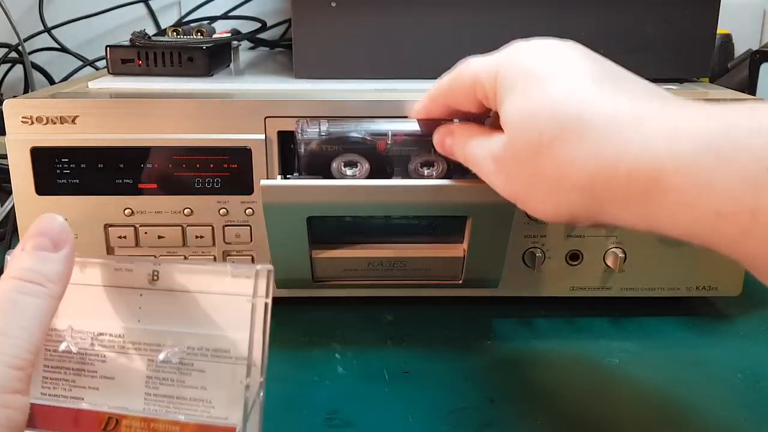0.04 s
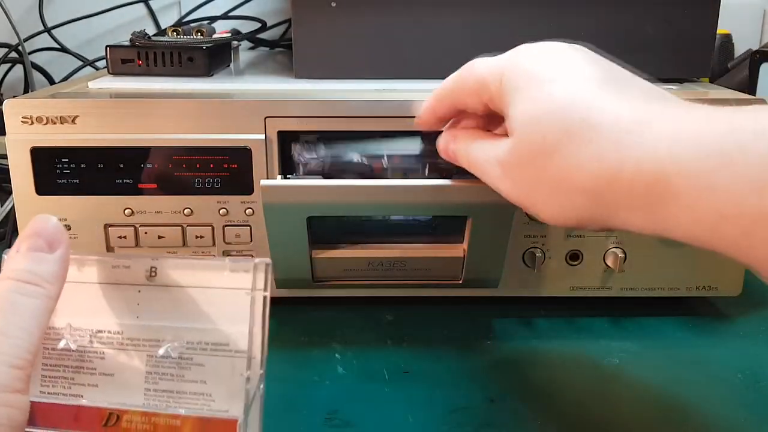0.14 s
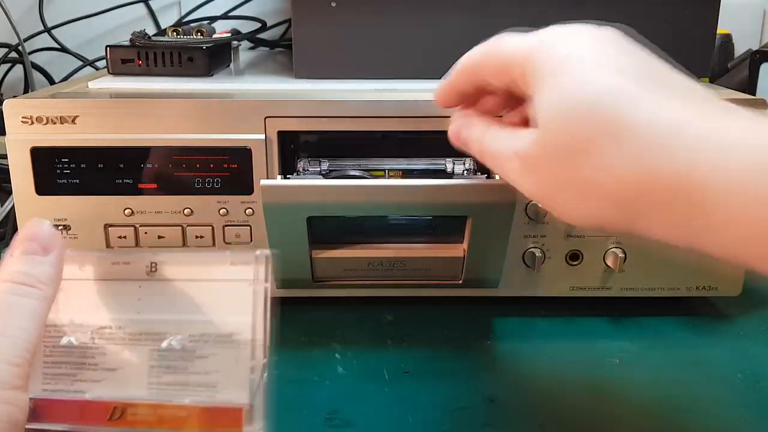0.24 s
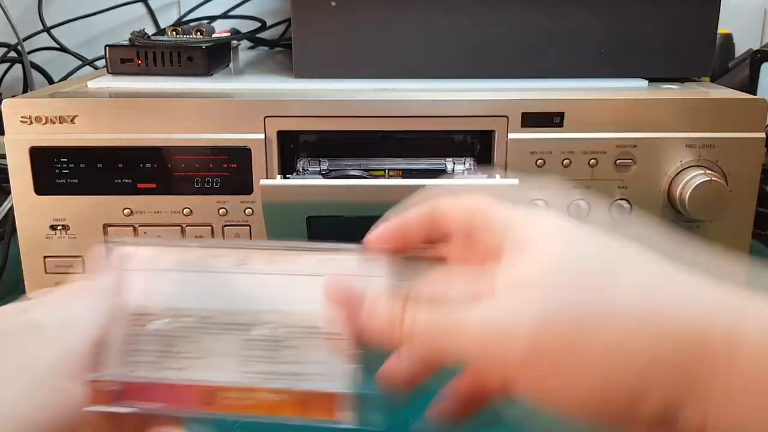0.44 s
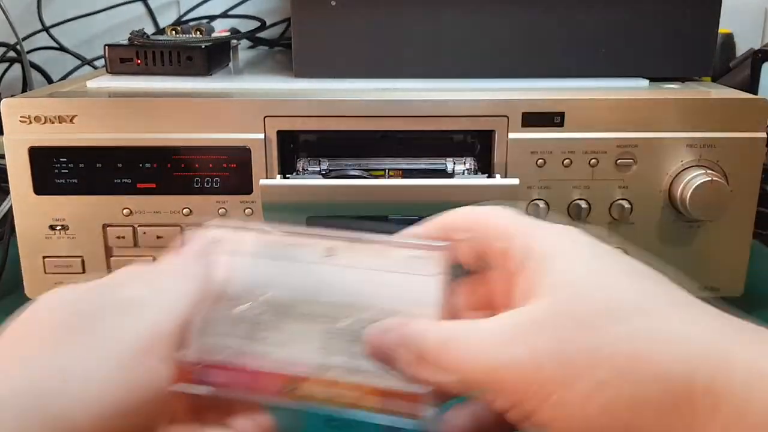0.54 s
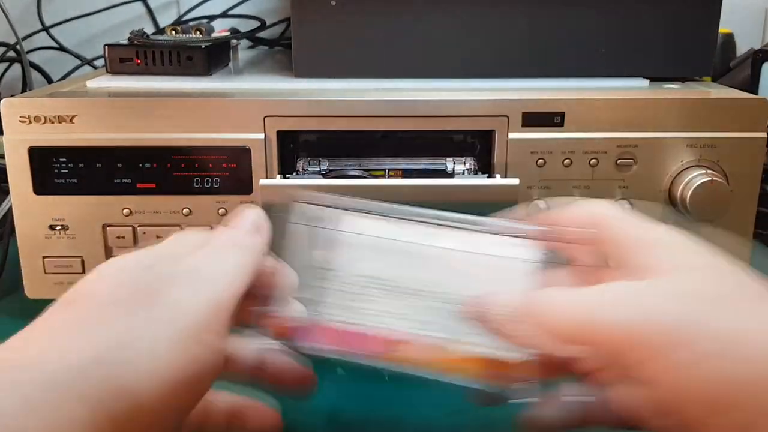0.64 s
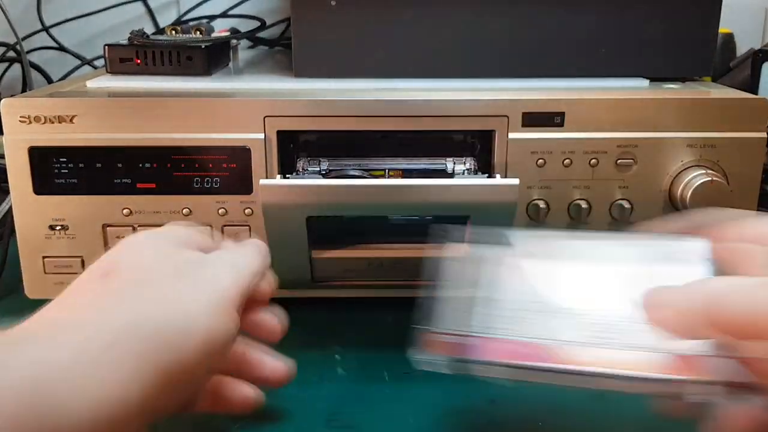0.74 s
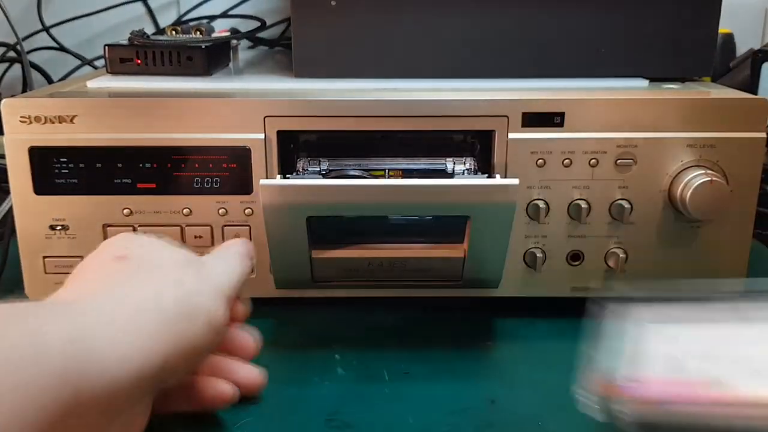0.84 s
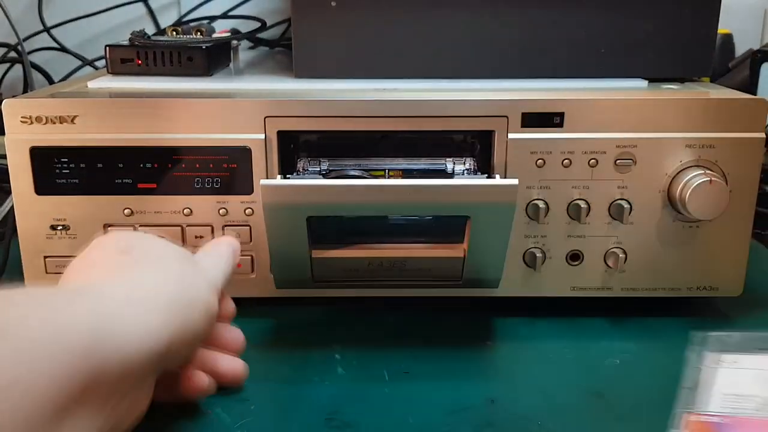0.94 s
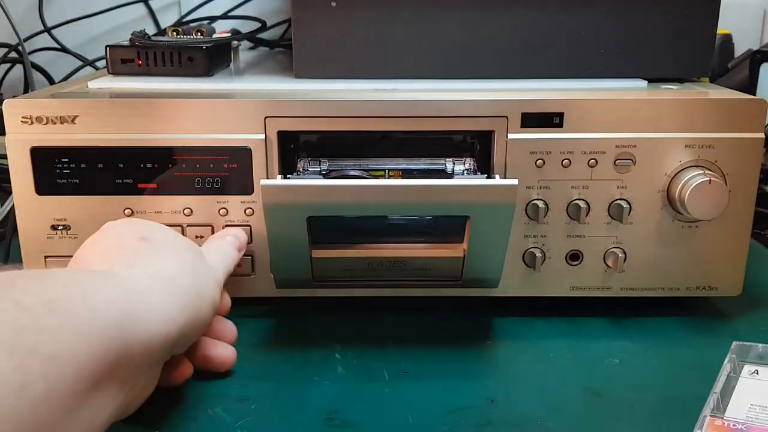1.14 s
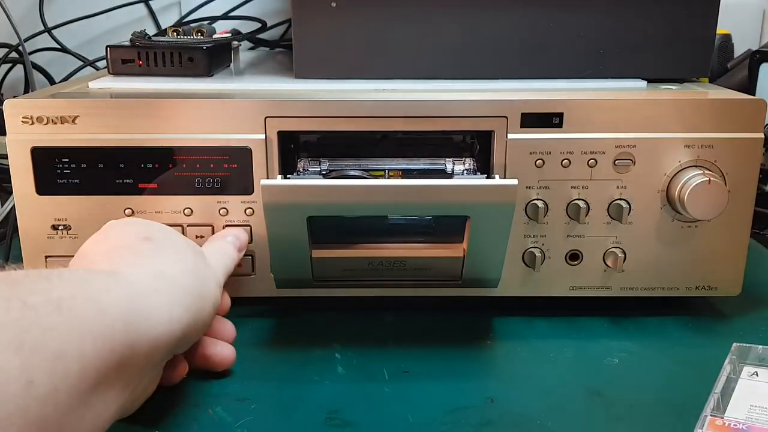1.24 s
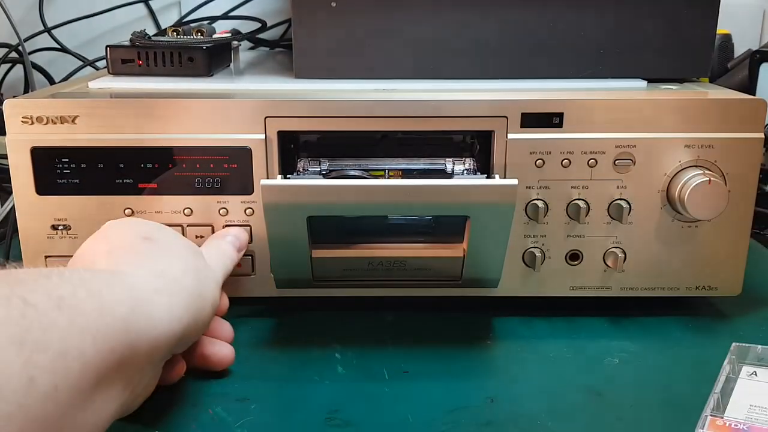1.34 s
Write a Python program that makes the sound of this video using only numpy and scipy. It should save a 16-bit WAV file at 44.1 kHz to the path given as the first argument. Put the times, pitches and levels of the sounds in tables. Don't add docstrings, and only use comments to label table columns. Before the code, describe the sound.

Close phone microphone in a small furnished room with low hum: a cassette clunks into a deck holder, the chassis rings softly, the holder ticks, a thin plastic case hits the desk, and a thumb taps a button.

```python
import sys
import numpy as np
from scipy import signal
from scipy.fft import rfft, irfft
from scipy.io import wavfile

SR = 44100
rng = np.random.default_rng(int(sys.argv[2]) if len(sys.argv) > 2 else 0)


def rack_gain(trim_db):
    fader = np.asarray(trim_db, float)
    return 10 ** (fader / 20)


def persist_wave(psi):
    counts = np.round(np.clip(psi, -1, 1) * 32767).astype(np.int16)
    wavfile.write(sys.argv[1], SR, np.atleast_2d(counts).T)


N = 61739
TIME_S = np.arange(N) / SR


def at_hz(points, hz, column=1):
    points = np.array(points)
    return np.interp(np.log(hz), np.log(points[:, 0]), points[:, column])


def rms_one(x):
    return x / np.sqrt(np.mean(x ** 2) + 1e-20)


def coloured(x, spectrum):
    hz = np.maximum(np.fft.rfftfreq(len(x), 1 / SR), 1)
    return irfft(rfft(x) * rack_gain(at_hz(spectrum, hz)), len(x))


def bandpass(x, low_hz, high_hz):
    return signal.sosfilt(signal.butter(2, [low_hz, high_hz], "band", fs=SR, output="sos"), x)


def ring(clicks, hz, t60_s):
    radius = rack_gain(-60 / (max(t60_s, 1e-3) * SR))
    w = 2 * np.pi * hz / SR
    return signal.lfilter([0, np.sin(w)], [1, -2 * radius * np.cos(w), radius ** 2], clicks + 1e-18)


def struck(hits, modes, crack_colour, rise_s):
    spread_db, crack_t60_s, crack_rise_s = 2.0, 0.027, 0.00013
    body, cracks = np.zeros((2, N))
    chance = rng.standard_normal((len(hits), len(modes)))
    noise = rms_one(coloured(rng.standard_normal(N), crack_colour))
    pushes = []
    for start_s, level_db, crack_db, soft_ms in hits:
        age = np.maximum(TIME_S - start_s, 0)
        push = age * np.exp(-age * 4000 / max(soft_ms, .02))
        pushes.append(rack_gain(level_db) * push / push.sum())
        cracks += rack_gain(crack_db - 60 * age / crack_t60_s) * np.minimum(age / crack_rise_s, 1) * noise
    for k, (hz, level_db, t60_s) in enumerate(modes):
        force = rack_gain(level_db + spread_db * chance[:, k]) @ np.array(pushes)
        rising_t60_s = 1 / (1 / t60_s + 1 / (np.log(1000) * rise_s))
        swell = ring(force, hz, t60_s) - ring(force, hz, rising_t60_s)
        body += (-1) ** k * swell
    return np.array([body, cracks])


# start_s, level_db, crack_db, soft_ms
HOLDER_HITS = [(0.0005, -49, -70.5, 0.6), (0.007, -52.5, -82.5, 0.56), (0.1905, -33, -53.5, 0.2),
               (0.194, -26.5, -64.5, 0.26), (0.205, -43, -67, 0.67), (0.2105, -28.5, -65.5, 0.11),
               (0.2155, -47, -64.5, 0.38), (0.221, -35.5, -56, .25), (0.2412, -10, -27, 0.1),
               (0.2439, -29, -27, 0.14), (0.2465, -17.5, -38.5, .15), (0.2483, -11, -31.5, 0.53),
               (0.2509, -14.5, -36.5, 0.35), (0.2575, -21, -36.5, 0.74), (0.278, -39.5, -46.5, 0.44),
               (0.287, -32.5, -51.5, 0.13)]
# pitch_hz, level_db, t60_s
HOLDER_MODES = [(566.6, -15.5, 0.083), (648.5, -17, 0.087), (780, -17, 0.071), (877, -38.5, 0.03),
                (1050, -13.5, 0.027), (1200, -31, 0.013), (1300, -10, 0.0592), (1531, -13.5, 0.038),
                (1850, -27, 0.21), (2416, -32, 0.15), (3372, -19.5, 0.039), (3780, -17.5, .04),
                (4420, -22, 0.0085), (6460, -31.5, .04)]
# freq_hz, level_db (per Hz)
HOLDER_CRACK = [(300, -3.5), (1100, 3.5), (2400, -7.5), (4000, -6), (6000, -9), (8000, -20.5),
                (11000, -20.5), (15500, -39.5)]


def holder_clunk():
    return struck(HOLDER_HITS, HOLDER_MODES, HOLDER_CRACK, rise_s=0.0015)


# start_s, pitch_hz, level_db, hold_s, swell_db
HOLLOWS = [
    (.2415, 1129, -16.5, .0118, 4.5),
    (1.0045, 1010, -28, .009, -5),
    (.1908, 1129, -38, .007, 6),
    (.219, 1110, -40, .007, 3),
]


def hollow():
    attack_s, release_t60_s = .0006, .014
    start_s, hz, level_db, hold_s, swell_db = np.transpose(HOLLOWS)[:, :, None]
    age = np.maximum(TIME_S - start_s, 0)
    swell = swell_db * np.minimum(age / hold_s, 1)
    release = 60 * np.maximum(age - hold_s, 0) / release_t60_s
    height = rack_gain(level_db + swell - release) * (1 - np.exp(-age / attack_s))
    return np.sum(height * np.sin(2 * np.pi * hz * age), axis=0)


# start_s, pitch_hz, level_db, t60_s
PINGS = [(-.004, 580.5, -46, 0.056), (-.003, 1130, -46.5, 0.04), (-.003, 2296, -69, 0.084),
         (-.003, 3960, -74, 0.06), (.006, 614, -44.5, 0.028), (.023, 4100, -75, 0.042),
         (.2035, 1200, -42.5, 0.041), (.2115, 1130, -37, 0.013), (.2565, 1125, -21, 0.027),
         (.192, 5900, -70, .08), (0.199, 4500, -46, 0.035), (0.209, 3140, -45, 0.015),
         (0.219, 4080, -52, .05), (0.226, 3020, -46, .02), (.2425, 4700, -21.5, 0.023),
         (.242, 3290, -26.5, .03), (.243, 5900, -36, .03), (0.2437, 5330, -47.5, .04),
         (.247, 3476, -26, 0.039), (.2475, 1850, -22, 0.027), (.249, 3870, -28, .035),
         (.250, 4460, -47, .03), (0.255, 7000, -44.5, .02), (.279, 1300, -26.5, 0.035),
         (1.001, 4700, -74, 0.018), (1.0039, 7000, -34.5, 0.017), (1.0045, 11020, -44.5, 0.017),
         (1.0055, 8850, -50, 0.023), (1.006, 2080, -34.5, 0.023), (1.012, 2750, -44.5, 0.052),
         (1.017, 3710, -43, 0.028), (1.02, 1319, -38.5, 0.064), (1.036, 1200, -55, 0.16),
         (1.025, 4400, -62.5, 0.11), (1.044, 2740, -53, 0.096), (1.3155, 3600, -74, 0.014),
         (1.326, 1200, -69, 0.15), (1.3655, 1910, -51, 0.047), (1.371, 830, -50, .02),
         (1.3725, 500, -60, 0.012), (1.39, 1710, -63, 0.047), (.6575, 1042, -64, 0.029),
         (1.005, 14200, -64, 0.013), (1.375, 3200, -66, 0.053)]


def pings():
    rise_s = .001
    start_s, hz, level_db, t60_s = np.transpose(PINGS)[:, :, None]
    age = np.maximum(TIME_S - start_s, 0)
    height = rack_gain(level_db - 60 * age / np.maximum(t60_s, .003)) * (1 - np.exp(-age / rise_s))
    return np.sum(height * np.sin(2 * np.pi * hz * age), axis=0)


# pitch_hz, level_db, t60_s
RINGS = [(543, -49.5, 0.94), (1130, -59, 0.81), (3380, -89, 0.42), (196.7, -20, 0.1), (250, -42.5, 0.77),
         (322.7, -34, 0.15), (480.2, -33, 0.058), (177.5, -48, 0.2), (212.5, -42, 0.14), (373, -50.5, 0.38)]
RING_STARTS = [0.25, 0.25, 0.65, 0.256, 0.262, 0.244, 0.246, 1.006, 0.2, 0.196]


def long_rings():
    rise_s, latch_s, latch_t60_s = 0.0068, .6, .08
    out = np.zeros(N)
    for start_s, (hz, level_db, t60_s) in zip(RING_STARTS, RINGS):
        age = np.maximum(TIME_S - start_s, 0)
        damped_s = np.maximum(TIME_S - latch_s, 0) * (start_s < latch_s)
        height = rack_gain(level_db - 60 * age / t60_s - 60 * damped_s / latch_t60_s)
        out += height * (1 - np.exp(-age / rise_s)) * np.sin(2 * np.pi * hz * age)
    return out


# time_s, level_db
SLIDE = [(0.13, -90.5), (0.147, -73.5), (0.16, -65.5), (0.189, -61), (0.198, -56), (0.215, -57),
         (0.231, -67.5), (0.238, -70.5)]
# time_s, level_db
CREEP = [(.625, -93), (.642, -84), (.66, -77), (0.689, -99)]
# pitch_hz, level_db, t60_s
GUIDES = [(1090, -2.5, 0.031), (2140, -6, 0.0065), (4560, 1, 0.0023), (5600, -2.5, .005),
          (6200, -12.5, 0.0037), (8450, -20.5, .004), (10300, -20, .005)]


def slide():
    slips_per_s = 8000
    slips = (rng.random(N) < slips_per_s / SR) * rack_gain(2.4 * rng.exponential(1, N))
    slips = slips * rng.choice([-1, 1], N)
    slips = signal.sosfilt(signal.butter(6, 12000, fs=SR, output="sos"), slips)
    rasp = np.zeros(N)
    for hz, level_db, t60_s in GUIDES:
        rasp += rack_gain(level_db) * rms_one(ring(slips, hz, t60_s))
    motion = np.zeros(N)
    for move in (SLIDE, CREEP):
        time_s, level_db = np.transpose(move)
        motion += rack_gain(np.interp(TIME_S, time_s, level_db, left=-200, right=-200))
    return rms_one(rasp) * motion


# start_s, level_db, crack_db, soft_ms
SETTLE_HITS = [
    (0.088, -49, -107, 0.46),
    (0.567, -51.5, -88, 0.42),
    (0.596, -42.5, -69, 0.33),
    (0.6004, -31, -61.5, 0.19),
    (0.636, -79, -78, 0.27),
    (0.646, -71, -75, 0.66),
    (0.6575, -50, -82, 0.29),
    (0.666, -52, -74.5, 0.4),
    (0.882, -66, -79, .4),
]
# pitch_hz, level_db, t60_s
SETTLE_MODES = [(428.8, -16.5, .04), (888, -8.5, 0.029), (1103, -1, 0.031), (1613, -22, 0.025),
                (3200, -35, 0.0089), (4520, -28, 0.016)]
# freq_hz, level_db (per Hz)
SETTLE_CRACK = [(300, -9), (1500, 12), (2600, -6.5), (3600, 3.5), (5000, -8), (7000, -6), (10000, -40),
                (15500, -56)]


def holder_settling():
    return struck(SETTLE_HITS, SETTLE_MODES, SETTLE_CRACK, rise_s=0.0025)


# start_s, level_db, crack_db, soft_ms
CASE_HITS = [
    (0.9995, -53, -95, 0.4),
    (1.0044, -20.5, -37.5, 0.11),
    (1.0058, -25.5, -36, 0.062),
    (1.0095, -35, -54, 0.2),
    (1.0135, -42, -43, 0.47),
    (1.0192, -42, -45.5, 0.15),
]
# pitch_hz, level_db, t60_s
CASE_MODES = [(451.5, -17.5, 0.057), (705, -34, 0.043), (920, -34, 0.027), (1300, -22, 0.04),
              (1665, -10, 0.045), (2080, -11, 0.025), (2750, -28, 0.029), (3890, -28, 0.023),
              (4250, -34, 0.023), (4753, -22, 0.029), (5050, -18, 0.029), (5740, -1, 0.015),
              (6360, -6, 0.017), (7140, -11, 0.021)]
# freq_hz, level_db (per Hz)
CASE_CRACK = [(300, -7), (1200, 8.5), (2500, 0.5), (4000, -1.5), (6000, -6.5), (8500, -12.5), (11000, -22),
              (15500, -34.5)]


def case_clack():
    return struck(CASE_HITS, CASE_MODES, CASE_CRACK, rise_s=0.0047)


# start_s, level_db, crack_db, soft_ms
THUMB_HITS = [
    (1.274, -68, -81.5, 0.33),
    (1.314, -48.5, -84, 0.55),
    (1.323, -58, -79, 0.68),
]
# pitch_hz, level_db, t60_s
PANEL_MODES = [(710, -11.5, 0.023), (1041, -3, 0.057), (1270, 0, 0.044), (1523, -7, .03),
               (3600, -26, 0.012)]


def thumb():
    return struck(THUMB_HITS, PANEL_MODES, SETTLE_CRACK, rise_s=0.000442)


# start_s, level_db, crack_db, soft_ms
BUTTON_HITS = [
    (1.3658, -49, -58.5, 0.18),
    (1.372, -49.5, -60.5, 0.25),
    (1.381, -46, -77.5, 0.2),
]
# pitch_hz, level_db, t60_s
BUTTON_MODES = [(468, -12, 0.022), (814, -20.5, 0.018), (1350, -26, 0.0064), (2120, -15.5, 0.023),
                (2850, -23.5, 0.036), (3390, -24.5, 0.023), (4180, -31, 0.017), (5500, -13.5, 0.016)]


def button():
    return struck(BUTTON_HITS, BUTTON_MODES, CASE_CRACK, rise_s=0.00042)


# time_s, level_db
RUSTLE = [(0, -58), (0.037, -68), (0.139, -67.5), (0.303, -52), (0.55, -86), (0.629, -65), (0.66, -70.5),
          (0.721, -78), (0.839, -93), (0.885, -75.5), (0.94, -87), (1.099, -66), (1.251, -79.5), (1.4, -69)]
# freq_hz, level_db (per Hz)
CLOTH = [(350, -18.5), (600, 0.5), (1150, 1), (1450, -5.5), (1700, -24), (2600, -29), (3500, -24.5),
         (9000, -43)]


def rustle():
    grain_db = 2.0 * np.repeat(rng.exponential(1, N // 200 + 1), 200)[:N]
    grains = rng.standard_normal(N) * rack_gain(grain_db)
    time_s, level_db = np.transpose(RUSTLE)
    return rms_one(coloured(grains, CLOTH)) * rack_gain(np.interp(TIME_S, time_s, level_db))


# freq_hz, t60_s, level_db
ROOM = [(161.5, 0.37, 4), (500, 0.22, -0.5), (1130, 0.35, -11.5), (2700, 0.29, -6.5), (5000, 0.38, -14),
        (10000, 0.28, -10.5), (14690, .16, -11)]


def room(x):
    onset_s = .011
    edges_hz = 70 * 2 ** np.arange(0, 8.1, .5)
    white = rng.standard_normal((2, N))
    tail = np.zeros(N)
    for k, (low_hz, high_hz) in enumerate(zip(edges_hz, edges_hz[1:])):
        hz = np.sqrt(low_hz * high_hz)
        t60_s = at_hz(ROOM, hz)
        decay = rack_gain(at_hz(ROOM, hz, column=2) - 60 * TIME_S / t60_s)
        tail += bandpass(white[k % 2], low_hz, high_hz) * decay / np.sqrt(t60_s * SR / 14)
    tail *= 1 - np.exp(-(TIME_S / onset_s) ** 2)
    return signal.fftconvolve(x, tail)[:N]


# freq_hz, level_db (per Hz)
AIR = [(25, -23.5), (70, 0.5), (110, -12), (200, -7.5), (400, -18.5), (800, -38.5), (1300, -39.5),
       (1560, -59.5)]
# freq_hz, level_db (per Hz)
HISS = [(1000, -4.5), (2500, -9), (4500, -4), (6500, 2.5), (10000, 0.5), (12000, -9), (13000, -37.5),
        (13600, -69.5)]


def air():
    hum_hz, hum_width_hz = 96, 15
    rumble_db, hum_db, hiss_db = -59, -58, -86
    hum_t60_s = np.log(1000) / (np.pi * hum_width_hz)
    hum = ring(rng.standard_normal(2 * N), hum_hz, hum_t60_s)[N:]
    rumble = coloured(rng.standard_normal(N), AIR + [(4000, -90)])
    hiss = coloured(rng.standard_normal(N), HISS)
    return rack_gain(rumble_db) * rms_one(rumble) + rack_gain(hum_db) * rms_one(hum) + rack_gain(hiss_db) * rms_one(hiss)


def scene():
    modes_room_db, crack_room_db, ring_room_db = -6.5, 4, -8
    modes, cracks = holder_clunk() + holder_settling() + case_clack() + thumb() + button()
    modes = modes + pings() + hollow()
    rasp, rings = slide(), long_rings()
    to_walls = rack_gain(modes_room_db) * modes + rack_gain(crack_room_db) * cracks
    to_walls = to_walls + rasp + rack_gain(ring_room_db) * rings
    return (modes + cracks + rasp + rings + room(to_walls) + rustle() + air())[None]


def roll_off(x):
    return signal.sosfilt(signal.butter(12, 15780, fs=SR, output="sos"), x)


def record(dry):
    limit = 0.34
    band = bandpass(dry, 44.94, 15500)
    return roll_off(limit * np.tanh(band / limit))


dry = scene()
out = record(dry)
persist_wave(out)
```